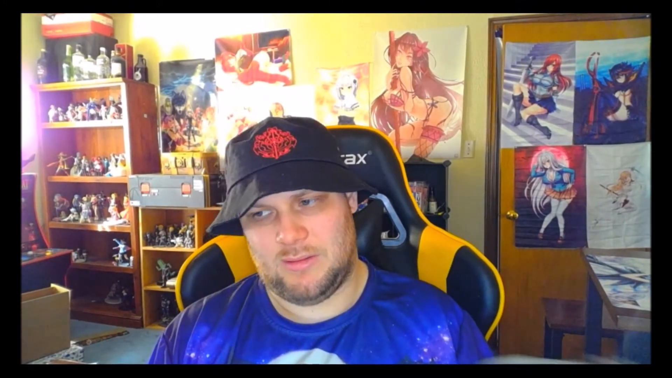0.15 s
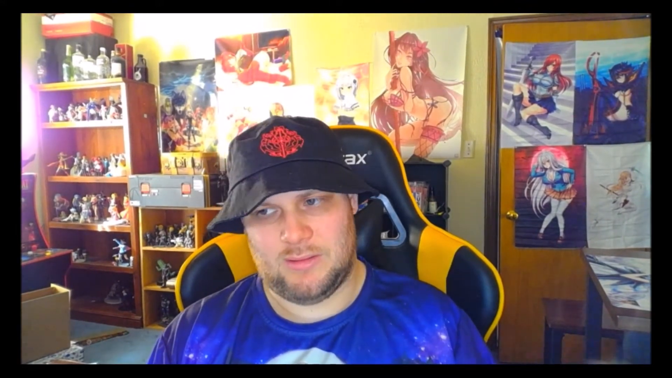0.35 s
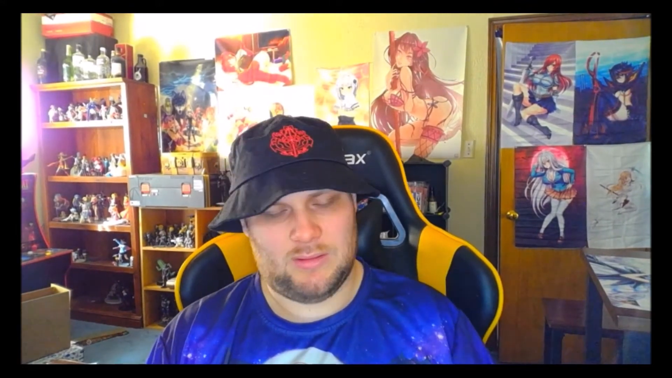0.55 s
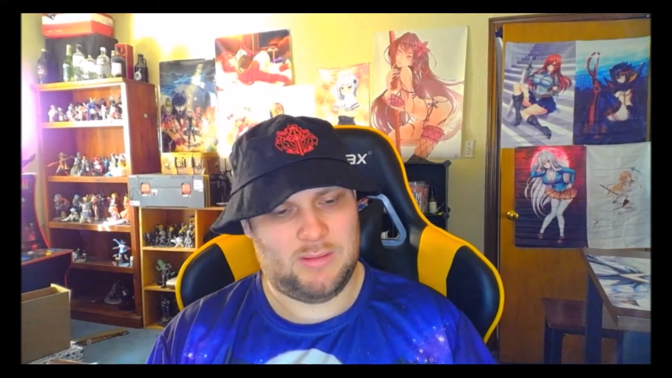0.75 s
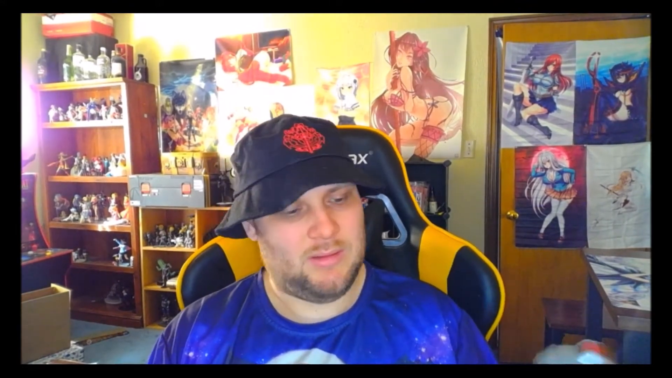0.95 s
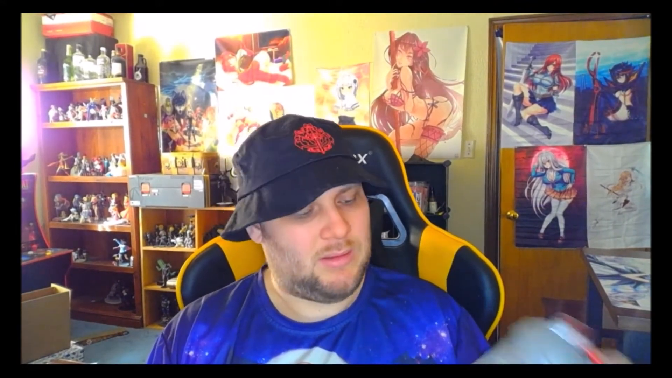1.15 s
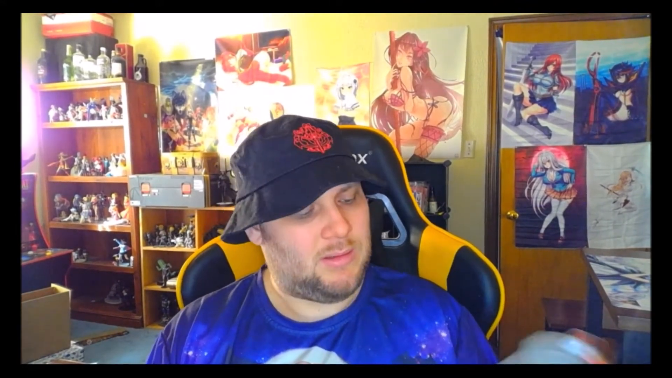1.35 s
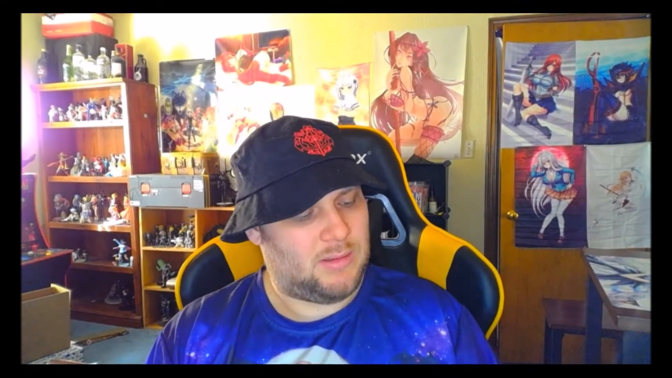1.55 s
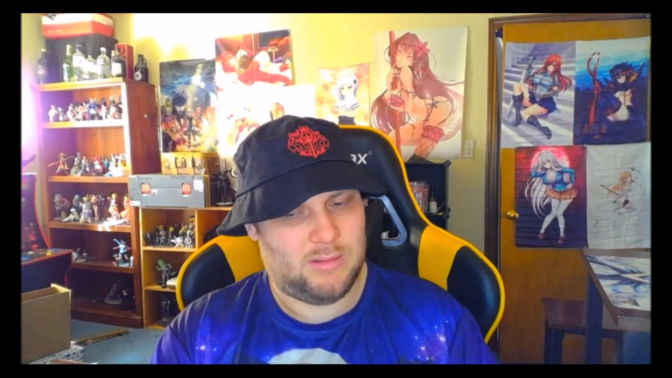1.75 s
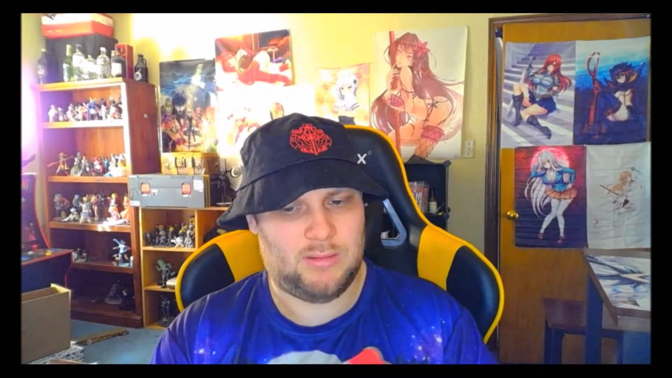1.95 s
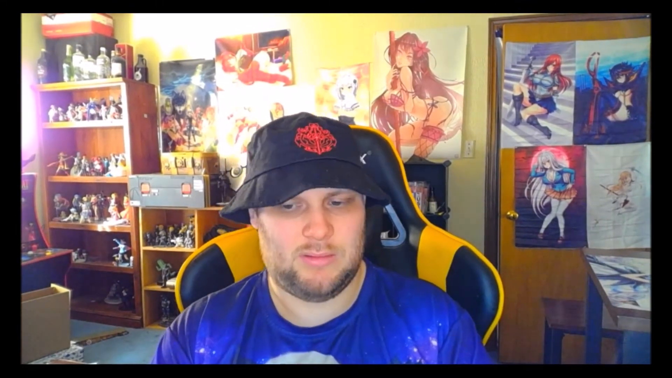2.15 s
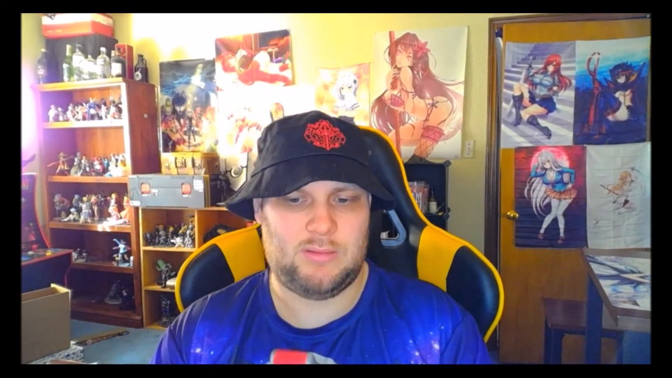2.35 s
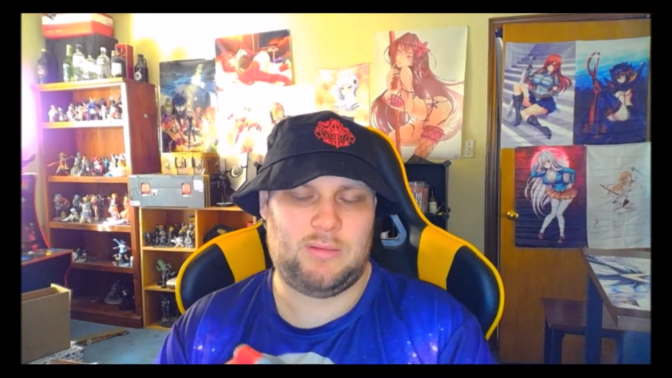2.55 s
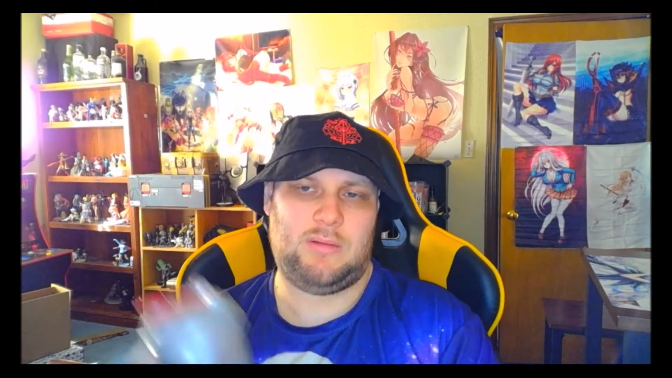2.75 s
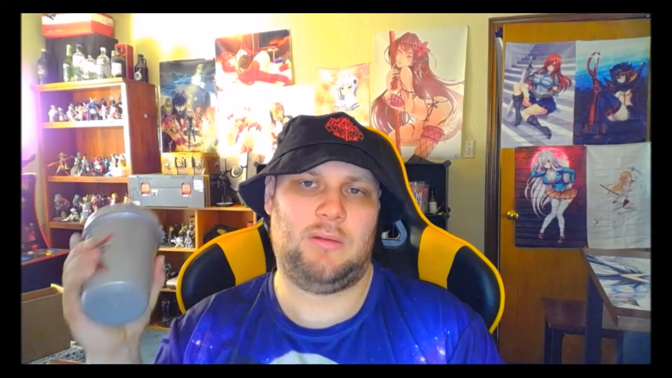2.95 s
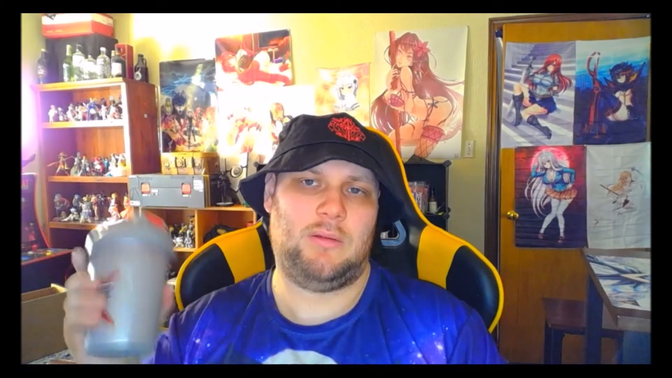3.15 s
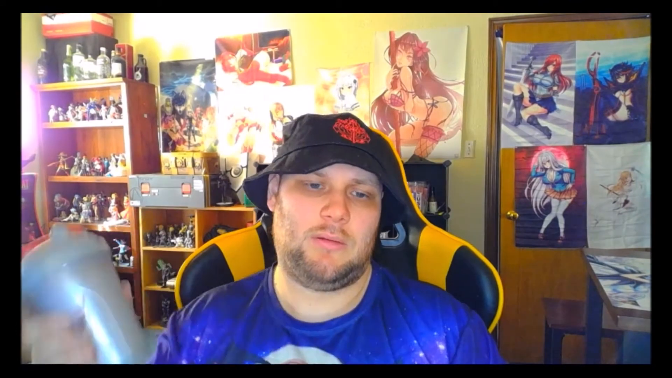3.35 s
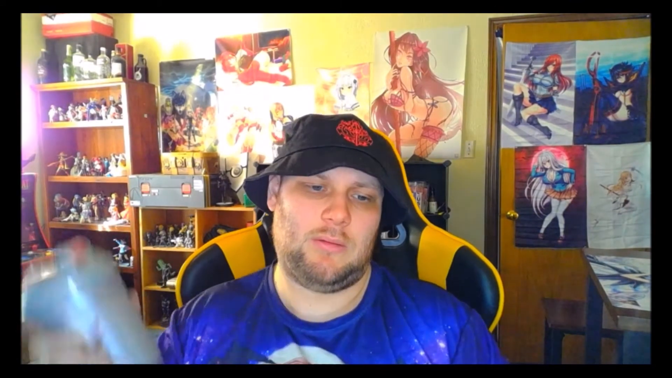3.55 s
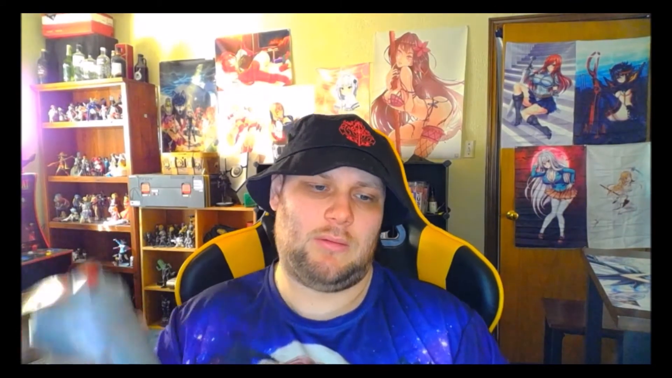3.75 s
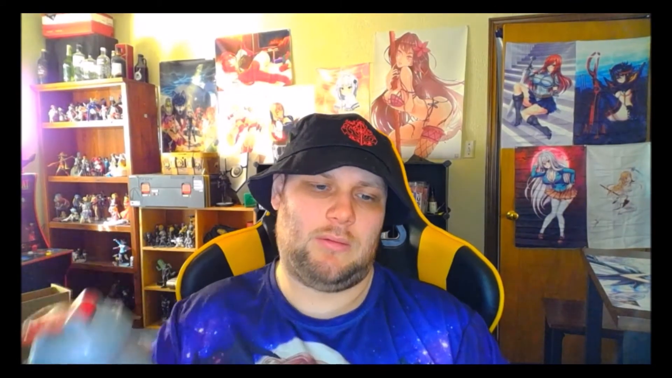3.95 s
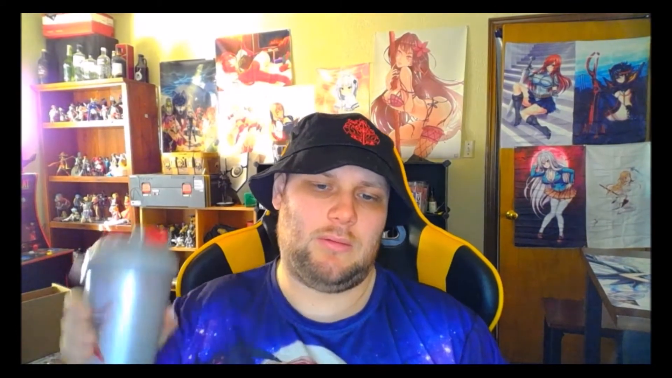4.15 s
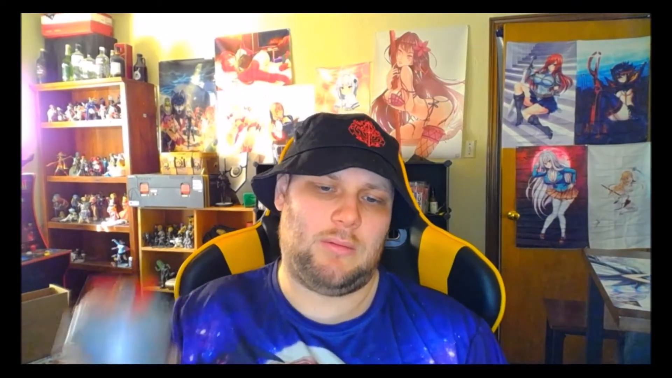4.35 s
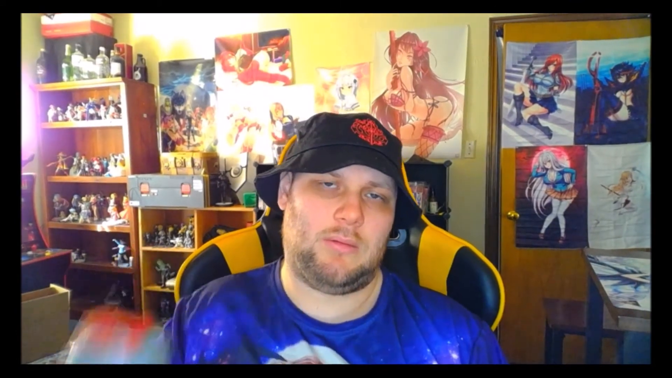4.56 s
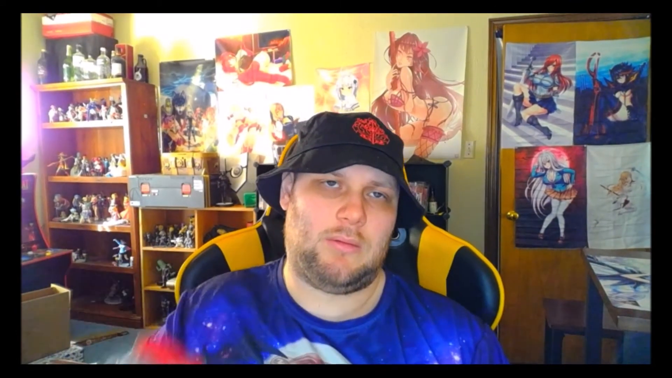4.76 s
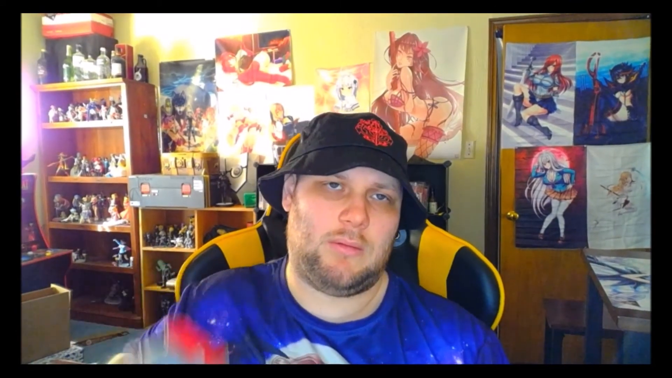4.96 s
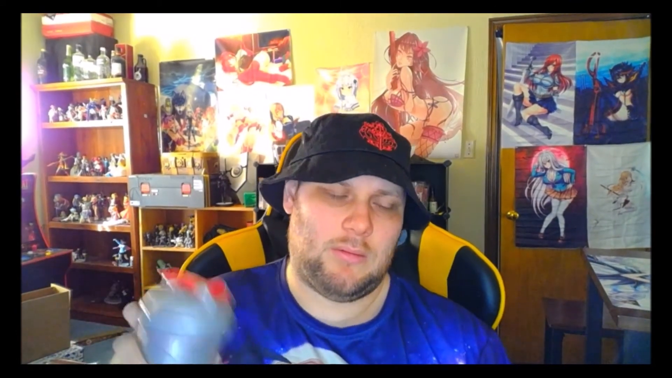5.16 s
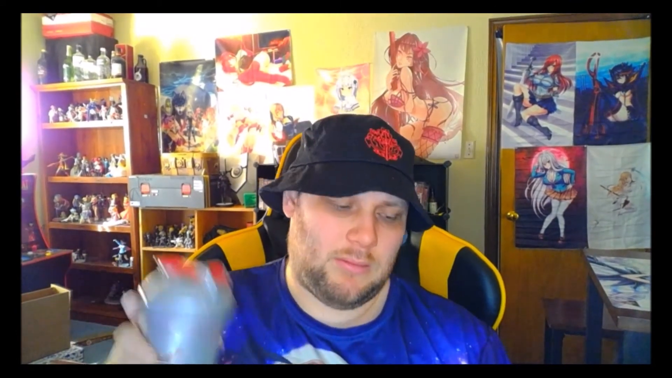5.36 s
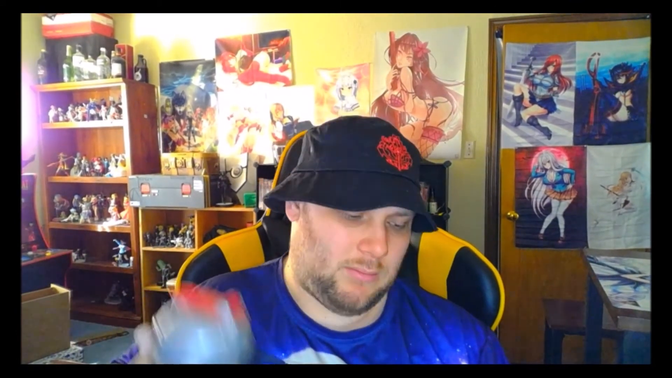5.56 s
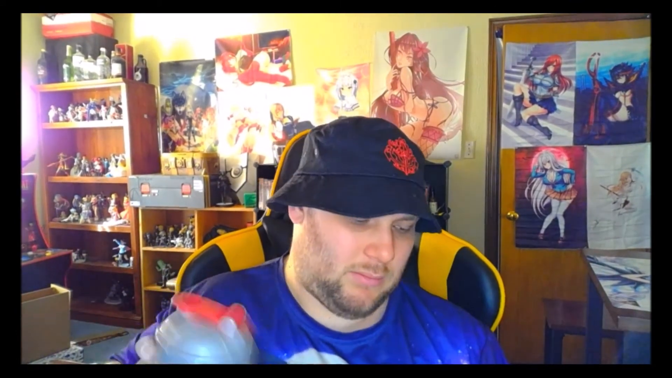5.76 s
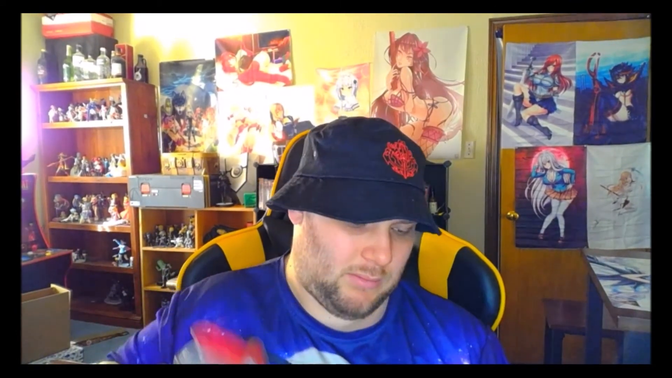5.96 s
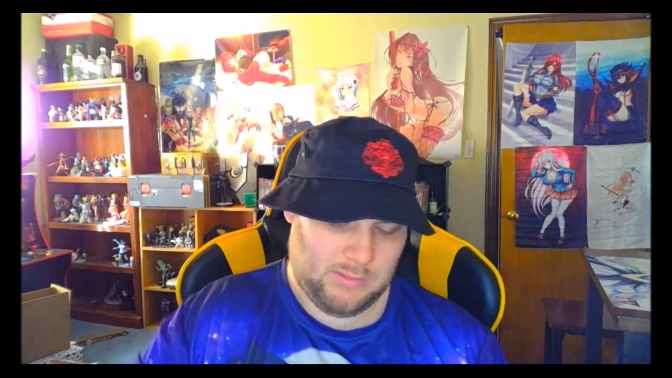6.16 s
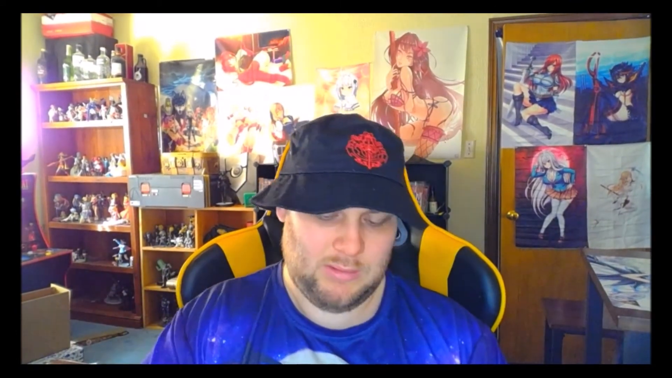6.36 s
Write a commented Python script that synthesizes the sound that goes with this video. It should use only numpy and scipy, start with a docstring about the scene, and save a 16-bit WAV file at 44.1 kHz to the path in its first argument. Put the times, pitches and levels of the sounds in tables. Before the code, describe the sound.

Close to the microphone in a small quiet room, liquid sloshes in a fast, even rhythm inside a plastic shaker cup, with hollow glugs, fizzy spray and irregular clacks from the mixing ball. A short first bout dies away into small bubble pops and faint handling bumps. A second, longer bout grows stronger, each swing pushing a little air at the microphone, then stops as the drink settles.

```python
"""Drink in a plastic shaker cup

Two bouts of hard shaking, about nine strokes a second, in a small quiet room. The liquid lands in
turn on base and lid with a gulp of trapped air and a splash of drops and spray, brighter on the lid.
The mixing ball knocks on the plastic, each stroke puffs air at the microphone, and bubbles pop among
the strokes and as the drink settles."""
import sys
import numpy as np
from scipy import signal
from scipy.fft import rfft, irfft, next_fast_len
from scipy.io import wavfile
from scipy.ndimage import uniform_filter1d, map_coordinates

SR = 44100
rng = np.random.default_rng(int(sys.argv[2]) if len(sys.argv) > 2 else 0)


def store_wav(level_fs):
    """Save 16-bit WAV to argv[1]."""
    pcm = np.round(np.clip(np.atleast_2d(level_fs), -1, 1) * 32767)
    wavfile.write(sys.argv[1], SR, pcm.T.astype(np.int16))


N = 281843


def amp(db):
    """Decibels to gain."""
    return 10 ** (np.asarray(db) / 20)


def unit(x):
    """x at rms 1."""
    return x / np.sqrt(np.mean(x ** 2) + 1e-20)


def along(points, hz):
    """(f/Hz, value) points read on a log axis."""
    f, v = np.transpose(points)
    return np.interp(np.log(hz + 1), np.log(f + 1), v)


def curve(points):
    """(t/s, value) points as one value per sample."""
    return np.interp(np.arange(N) / SR, *np.transpose(points))


def filtered(x, response):
    """x through a frequency response."""
    size = next_fast_len(len(x) + 8192)
    return irfft(rfft(x, size) * response(np.fft.rfftfreq(size, 1 / SR)), size)[:len(x)]


def noise(spectrum, size=N):
    """Coloured noise, rms 1."""
    return unit(filtered(rng.standard_normal(size), lambda hz: amp(along(spectrum, hz))))


def add(track, s, sound):
    """Mix a sound into the track at s seconds."""
    part = track[max(round(s * SR), 0):][:len(sound)]
    part += sound[:len(part)]


def swell(t, rise_s, fall_s):
    """Envelope of one surge: gathers, crests at t = 0, drains."""
    return np.exp(-np.where(t < 0, (t / rise_s) ** 2, np.abs(t / fall_s) ** 1.36))


def surges(rows):
    """Power-summed envelope of surges (t/s, level/dB, rise/s, fall/s)."""
    t, power = np.arange(N) / SR, np.zeros(N)
    for s, db, rise, fall in rows:
        near = slice(max(int((s - 0.2) * SR), 0), int((s + 0.3) * SR))
        power[near] += (amp(db) * swell(t[near] - s, rise, fall)) ** 2
    return np.sqrt(power)


# hiss spectrum: f/Hz, level/dB
HISS_SPECTRUM = [(30, 0), (150, 5.5), (1000, 2.5), (7000, -15), (15000, -2)]
def hiss():
    """Very faint steady noise floor."""
    return amp(-94) * noise(HISS_SPECTRUM)


# early reflections: delay/s, level/dB
ECHOES = [(.0035, -27), (.0078, -33.5), (0.0106, -24), (0.0202, -23)]
# room decay: f/Hz, T60/s
ROOM_T60 = [(150, 0.25), (700, 0.17), (3000, 0.21), (12000, 0.3)]
def room(x, tail_db):
    """Direct sound, echoes off desk and near walls, short diffuse tail."""
    hz, t, z = signal.stft(rng.standard_normal(SR // 2), SR, nperseg=256)
    decay = amp(-60 * t / along(ROOM_T60, hz)[:, None])
    build_up = 1 - np.exp(-t / 0.024)
    tail = signal.istft(z * decay * build_up, SR, nperseg=256)[1]
    response = amp(tail_db) * tail / np.linalg.norm(tail)
    for delay, db in ECHOES:
        add(response, delay, amp(db) * signal.windows.hann(5) / 2)
    return x + signal.fftconvolve(x, response)[:N]


# handling bumps: t/s, level/dB
HAND_BUMPS = [(0.45, -53), (0.69, -57), (1.125, -55.5), (1.58, -63), (2.01, -71.5), (2.08, -60),
              (2.23, -75.5), (2.525, -76), (2.996, -63), (6.18, -53)]
# bump spectrum: f/Hz, level/dB
BUMP_SPECTRUM = [(10, -14), (30, 6.5), (60, -5), (110, -19), (200, -41.5), (400, -66.5)]
def bumps(swell_s=0.036):
    """Low bumps of hand and arm."""
    return surges((s, db, swell_s, swell_s) for s, db in HAND_BUMPS) * noise(BUMP_SPECTRUM)


FIRM_DB = -40  # reference stroke
RISE_S, FALL_S = (0.035, 0.03), (0.044, 0.042)  # at FIRM_DB: (base, lid)
# landings of the drink: t/s, splash level/dB, gulp level/dB, air pocket f/Hz
LANDINGS = [(0.019, -45, -48.0, 624), (0.082, -44.5, -44, 364), (0.21, -45, -41, 580),
            (0.333, -43.5, -41, 458), (0.45, -43.5, -42, 335), (0.559, -43, -41, 540.0),
            (0.705, -46, -47, 710.0), (0.788, -40.5, -43.5, 350), (0.91, -44.5, -44.5, 654),
            (1.006, -41, -39.5, 612), (1.146, -45, -40.5, 245), (1.249, -41, -41, 574),
            (1.379, -45.5, -40, 350), (1.465, -42.5, -45, 725), (1.592, -48.5, -46.5, 715),
            (1.679, -57.5, -60.5, 600.0), (1.812, -69, -70, 620.0), (2.917, -50.5, -53.5, 695),
            (3.022, -43, -52, 410.0), (3.13, -45.5, -48, 530.0), (3.233, -43.0, -45.5, 600),
            (3.333, -47.5, -49, 750), (3.426, -41.5, -40.5, 400), (3.562, -45.5, -45.0, 368),
            (3.664, -42.5, -41.0, 434), (3.776, -44, -44, 387), (3.867, -44.5, -42, 383),
            (3.959, -42.5, -43.5, 630.0), (4.044, -40.5, -36.5, 575), (4.168, -41, -40.5, 550),
            (4.257, -37, -36, 755), (4.376, -42, -39, 395), (4.467, -37.5, -36.5, 535),
            (4.576, -38, -38.5, 596), (4.681, -38, -34, 497), (4.784, -39, -41, 607),
            (4.879, -38.5, -38, 533), (4.963, -38, -41, 404), (5.055, -38.0, -36.0, 378),
            (5.148, -40, -41.0, 610.0), (5.235, -40, -40, 660), (5.33, -40, -38.5, 390),
            (5.43, -39, -38.0, 633), (5.524, -38.5, -37, 367), (5.616, -36.5, -36, 597),
            (5.711, -37.5, -39, 414), (5.802, -41.0, -35, 616), (5.879, -41.5, -43, 410),
            (5.977, -43.5, -39.5, 630), (6.059, -57, -55, 440.0), (6.165, -57.5, -59, 590),
            (6.277, -67, -64, 580.0)]
def strokes():
    """Yield t/s, level/dB, end (0 base, 1 lid), rise/s, fall/s; harder strokes land more compactly."""
    for k, (s, db, _, _) in enumerate(LANDINGS):
        end = k % 2
        stretch = np.exp(-0.04 * max(db - FIRM_DB, -8))
        yield s, db, end, stretch * RISE_S[end], stretch * FALL_S[end]


# nearness of the cup (held low, raised to the microphone, lowered), also used by spray: t/s, level/dB
CUP_NEARNESS = [(0, -3), (1.6, -5), (2.9, 3), (4.2, -1), (5.85, -2), (6.05, 0)]
# puff spectrum: f/Hz, level/dB
PUFF_SPECTRUM = [(10, -22), (25, -5.5), (55, -12), (90, -14.5), (135, -12.5), (200, -28.5), (400, -55)]
def puffs(gain_db=-15, stretch=1.3):
    """Each swing pushes a low puff of air at the microphone; harder strokes push more."""
    envelope = surges((s, db + gain_db + max(db - FIRM_DB, -8), stretch * rise, stretch * fall)
                      for s, db, _, rise, fall in strokes())
    return amp(0.44 * curve(CUP_NEARNESS)) * envelope * noise(PUFF_SPECTRUM)


# wet ticks: t/s, level/dB, f/Hz, 1/e half-width/s
WET_TICKS = [(1.917, -59, 644, 0.01), (2.085, -72, 7440, 0.0052), (2.195, -60.5, 7300, 0.012),
             (2.402, -65, 7330, 0.0035), (2.85, -59, 2290, 0.0095), (6.158, -47, 7500, 0.0014),
             (6.193, -54.5, 2800, 0.012)]
def ticks(step_oct=0.32):
    """The nearly still drink ticks softly: short bursts of band noise."""
    out, t = np.zeros(N), np.arange(SR // 10) / SR
    centre_s = t.mean()
    for s, db, hz, width_s in WET_TICKS:
        band = [(hz * 2 ** (k * step_oct), -4.5 * k * k) for k in range(-4, 5)]
        envelope = np.exp(-((t - centre_s) / width_s) ** 2)
        add(out, s - centre_s, amp(db) * noise(band, size=len(t)) * envelope)
    return out


def bubble(t, hz, cycles, glide, onset_cycles=0.24):
    """A bubble swells, rings a few cycles and rises in pitch as it nears the surface."""
    age = t * hz / cycles
    tone = np.sin(2 * np.pi * hz * t * (1 + glide * np.minimum(age, 2)))
    return tone * np.exp(-age) * (1 - np.exp(-t * hz / onset_cycles))


# large bubbles, and one low knock at 2.993 s played the same way: t/s, level/dB, f/Hz
LARGE_BUBBLES = [(0.6644, -29, 607), (1.1125, -22.5, 1380), (1.1453, -33.5, 250), (1.6894, -38.5, 593),
                 (1.7985, -46, 608), (1.9147, -46, 602), (2.993, -32.5, 386), (3.2351, -27, 472),
                 (3.362, -25, 2420), (4.2555, -23, 525), (4.5244, -8.5, 2410), (5.0453, -23, 390),
                 (5.108, -22.5, 2600), (5.1943, -23, 2410), (5.807, -36.5, 453), (6.061, -26, 3260),
                 (5.619, -23, 580), (6.1704, -47, 565), (6.246, -45, 578), (6.2755, -52, 577)]
def pops():
    """Single large bubbles plop during and after each bout; a low knock sounds just as the second bout starts."""
    out, t = np.zeros(N), np.arange(SR // 10) / SR
    for s, db, hz in LARGE_BUBBLES:
        add(out, s, amp(db) * bubble(t, hz, cycles=2.8, glide=0.006, onset_cycles=0.74))
    return out


# ball hits: t/s, level/dB, relative crack level/dB, wall f/Hz
BALL_HITS = [(0.0617, -29, -19, 1900), (0.0698, -20.5, -17, 1840), (0.1916, -25, -28.5, 1040),
             (0.33, -23.5, -31.5, 2320), (0.414, -31.5, -37, 1850), (0.53, -26.5, -27, 2530),
             (0.5421, -18, -19.5, 2570), (0.7603, -23, -17.5, 2320), (0.7667, -19.5, -19, 2420),
             (0.986, -20, -15, 2060), (0.993, -19.5, -18, 2030), (1.104, -35, -26, 1272),
             (1.2452, -22, -14.5, 2340), (1.449, -23, -21, 1970), (1.6331, -37.5, -13, 2190),
             (2.885, -27, -38, 1800), (3.1294, -24, -29, 1530), (3.2156, -25, -10.5, 1610),
             (3.316, -26.5, -16.5, 2170), (3.5361, -20.5, -12, 2040), (3.7387, -20.5, -22, 1970),
             (3.8518, -25, -2, 2830), (3.9359, -24, -10.5, 1400), (4.1426, -19.5, -10.5, 1550),
             (4.3459, -18, -15, 2600), (4.5479, -21.5, -8, 2680), (5.4037, -22.5, -42, 1140),
             (5.4998, -25.5, -8, 2410), (5.864, -28, -3, 2450)]
# cup modes: f/Hz, level/dB, T60/s
CUP_MODES = [(614, -15.5, 0.13), (1813, -4.5, 0.054), (2200, -14.5, 0.05), (2394, 2, 0.2),
             (2900, -13, 0.091), (3570, -13.5, 0.027), (4390, -6, 0.062), (5930, -11.5, .1),
             (6740, -20, 0.063), (9340, -25.5, 0.095)]
# crack spectrum: f/Hz, level/dB
CRACK_SPECTRUM = [(2500, -23.5), (4500, -0.5), (7000, 3), (9000, -0.5), (11000, -5.5), (12500, -22),
                  (14000, -35), (15600, -44.5)]
def ball(rebound_s=0.0055, rebound_db=-8.5):
    """Each knock and its one rebound: hard crack, clack and clatter of the wall, ring of the cup."""
    out, t = np.zeros(N), np.arange(SR // 5) / SR
    clatter_spectrum = [(250, -14), (700, 4), (1900, 9.5), (4000, 5), (6000, -13), (12000, -40)]
    rebounds = [(s + rebound_s, db + rebound_db, crack_db, hz) for s, db, crack_db, hz in BALL_HITS]
    for s, db, crack_db, wall_hz in [*BALL_HITS, *rebounds]:
        # the moving drink loads the cup differently at every blow
        loading = rng.standard_normal((len(CUP_MODES), 2)) * (5.4, 0.015)
        ring = sum(amp(mode_db + shift_db - 60 * t / t60) * np.sin(2 * np.pi * hz * (1 + detune) * t)
                   for (hz, mode_db, t60), (shift_db, detune) in zip(CUP_MODES, loading))
        clack = bubble(t, wall_hz, cycles=1.7, glide=0, onset_cycles=0.12)
        clatter = noise(clatter_spectrum, size=len(t)) * amp(-60 * t / 0.042)
        crack = noise(CRACK_SPECTRUM, size=len(t)) * amp(crack_db - 60 * t / 0.026)
        wet_contact = 1 - np.exp(-t / 68e-6)
        knock = clack + amp(-10) * clatter + amp(-3.5) * crack + amp(-25.5) * ring
        add(out, s, amp(db) * wet_contact * knock)
    return out


# resonances of the air above the drink: f/Hz, width/Hz, level/dB
AIR_MODES = [(404, 61, 5), (593, 310, -0.5), (2480, 750, 3), (2860, 340, 2), (6300, 1200, 8)]
def cavity(x, spectrum):
    """x shaped by a spectrum and by the air space in the cup; rms 1."""
    def response(hz):
        modes_db = sum(db / (1 + (2 * (hz - centre) / width) ** 2) for centre, width, db in AIR_MODES)
        return amp(along(spectrum, hz) + modes_db)
    return unit(filtered(x, response))


def froth(spectrum, low_hz, high_hz, cycles, spread_db, wash, count, size):
    """Steady swarm of random bubbles, each `size` samples long, over a noise wash; rms 1."""
    when, pitch, loudness = rng.random((count, 3)).T[:, :, None]
    hz = low_hz * (high_hz / low_hz) ** pitch
    strength = amp(spread_db * np.minimum(-np.log(1 - loudness), 3)) * hz ** 1.5
    polarity = rng.choice([-1, 1], (count, 1))
    grains = strength * polarity * bubble(np.arange(size) / SR, hz, cycles, glide=0.078)
    positions = (when * N).astype(int) + np.arange(size)
    swarm = np.bincount(positions.ravel(), grains.ravel(), N)[:N]
    return unit(cavity(swarm, spectrum) + wash * cavity(rng.standard_normal(N), spectrum))


def tumble(x, depth_db, width_hz, rate_hz=55):
    """Tumbling liquid reshapes the air space, so brief resonances come and go; rms 1."""
    hz, t, z = signal.stft(x, SR, nperseg=512)
    grid = np.meshgrid(np.minimum(hz / width_hz, 159), t * rate_hz, indexing="ij")
    field = map_coordinates(rng.standard_normal((160, 400)), grid)
    return unit(signal.istft(z * amp(depth_db * field), SR, nperseg=512)[1][:N])


SPRAY_GAIN_DB = (-8.5, -6.5)  # (base, lid)
# spray spectrum: f/Hz, level/dB
SPRAY_SPECTRUM = [(2500, -39.5), (4500, 7), (5600, -2.5), (7000, -0.5), (9000, 2.5), (10500, -3),
                  (12000, -7), (14000, -20.5), (15600, -41)]
# foaminess, as lift of the top treble: t/s, level/dB
FOAM_LIFT = [(0, -2.5), (1.6, 5.5), (2.9, -3), (3.8, -14), (4.25, 0), (5.85, 4), (6.05, -27)]
def spray(stretch=0.94):
    """Fine spray: more from hard strokes, louder when near, brighter when the drink is foamy."""
    envelope = surges((s, db + SPRAY_GAIN_DB[end] + 0.51 * (db - FIRM_DB), stretch * rise, stretch * fall)
                      for s, db, end, rise, fall in strokes())
    mist = froth(SPRAY_SPECTRUM, low_hz=3780, high_hz=14460, cycles=5.4,
                 spread_db=7.5, wash=0.95, count=16000, size=260)
    mist = tumble(mist, depth_db=5, width_hz=190)
    finest = filtered(mist, lambda hz: np.clip((hz - 8500) / 4000, 0, 1))
    mist += (amp(curve(FOAM_LIFT)) - 1) * finest
    return amp(curve(CUP_NEARNESS)) * envelope * mist


# splash spectrum: f/Hz, level/dB
SPLASH_SPECTRUM = [(400, -53), (900, 1), (1400, 3.5), (2400, 2), (3400, -2.5), (4500, -7), (5600, -18.5),
                   (9000, -44)]
def splashes(gentle_db=-61.5, large_drop_hz=1800):
    """Breaking liquid throws drops at the wall; a gentle slosh throws only large, low-pitched ones."""
    envelope = surges((s, db, rise, fall) for s, db, _, rise, fall in strokes())
    drops = froth(SPLASH_SPECTRUM, low_hz=919, high_hz=5350, cycles=4.22,
                  spread_db=4, wash=0.33, count=14000, size=400)
    drops = tumble(drops, depth_db=3, width_hz=208.7)
    large = filtered(drops, lambda hz: 1 / (1 + (hz / large_drop_hz) ** 6))
    small_gain = envelope ** 2 / (envelope ** 2 + amp(gentle_db) ** 2)
    return envelope * (large + small_gain * (drops - large))


# gulp spectrum: f/Hz, level/dB
GULP_SPECTRUM = [(60, -27.5), (130, -3.5), (250, 1), (400, 0), (700, 1), (1100, -13), (1800, -13.5),
                 (4000, -66.5)]
def gulps(pocket_q=12, stretch=(0.78, 0.77)):
    """Each stroke folds a pocket of air into the drink, which glugs at its own pitch."""
    out, t = np.zeros(N), np.arange(-SR // 4, SR // 4) / SR
    swarm = froth(GULP_SPECTRUM, low_hz=149.6, high_hz=1511, cycles=2.54,
                  spread_db=4, wash=0.31, count=3500, size=1000)
    for (s, _, end, rise, fall), (_, _, db, hz) in zip(strokes(), LANDINGS):
        bubbles = swarm[rng.integers(N - len(t)):][:len(t)]
        pocket = signal.lfilter(*signal.iirpeak(hz, pocket_q, SR), bubbles)
        envelope = swell(t / stretch[end], rise, fall)
        rms = amp(db) * np.sqrt(np.mean(envelope ** 2))
        glug = rms * unit((bubbles + pocket) * envelope)
        start_s = s + t[0]
        add(out, start_s, glug[max(0, -round(start_s * SR)):])
    return out


def scene():
    """Shaker in the room, plus dry puffs, bumps and hiss; mono."""
    liquid = amp(0.39) * gulps() + amp(-0.77) * splashes() + spray()
    shaker = liquid + ball() + pops() + ticks()
    return (room(shaker, tail_db=-9.5) + puffs() + bumps() + hiss())[None]


# suppressor threshold per band: f/Hz, level/dB
THRESHOLD = [(60, -96.5), (200, -73), (600, -93), (3000, -78.5), (8000, -86.5), (12000, -77),
             (15000, -85.5)]
def suppress(x, depth_db):
    """Noise suppressor: turns down bands near or below threshold, cutting tails short."""
    hz, _, z = signal.stft(x, SR, nperseg=512)
    power = uniform_filter1d(np.abs(z) ** 2, size=3, axis=0)
    power = np.abs(uniform_filter1d(power, size=3, axis=1))
    gain = power / (power + amp(along(THRESHOLD, hz))[:, None] ** 2)
    return signal.istft(z * np.maximum(gain, amp(depth_db)), SR, nperseg=512)[1][:N]


def record(dry):
    """Microphone chain: noise suppressor, then band limit."""
    return np.array([filtered(suppress(channel, depth_db=-7), lambda hz: hz < 15600) for channel in dry])


dry = scene()
out = record(dry)
store_wav(out)
```